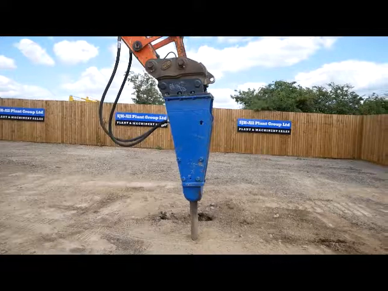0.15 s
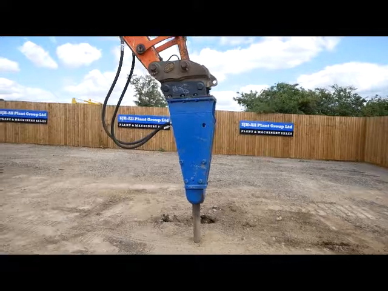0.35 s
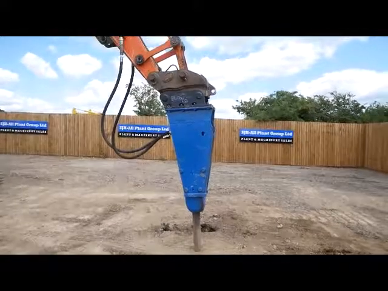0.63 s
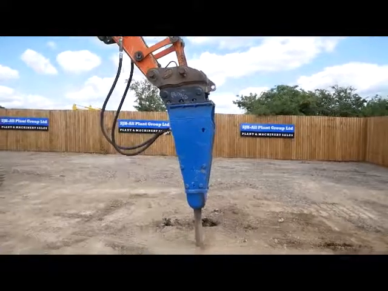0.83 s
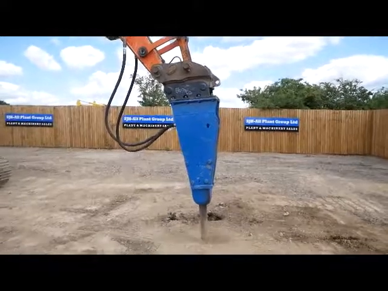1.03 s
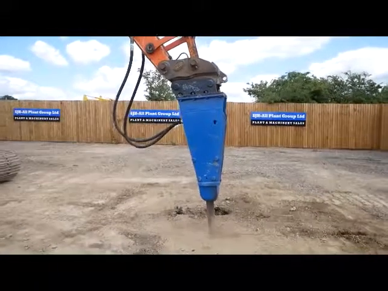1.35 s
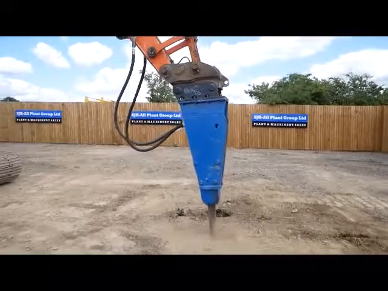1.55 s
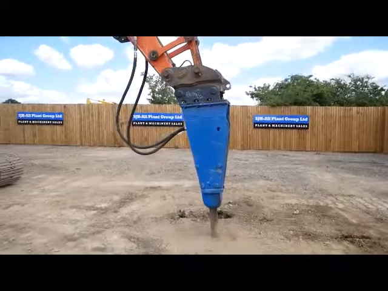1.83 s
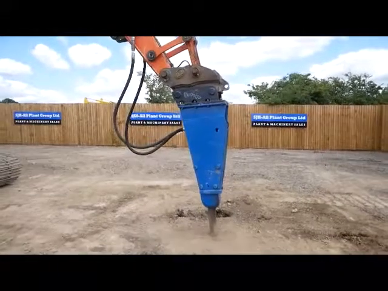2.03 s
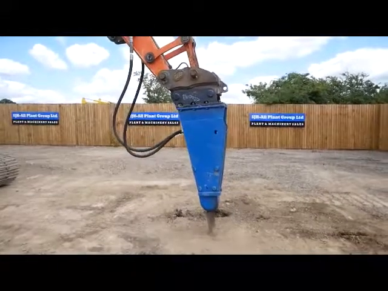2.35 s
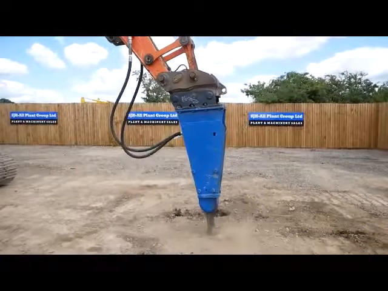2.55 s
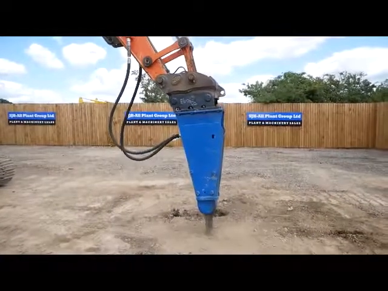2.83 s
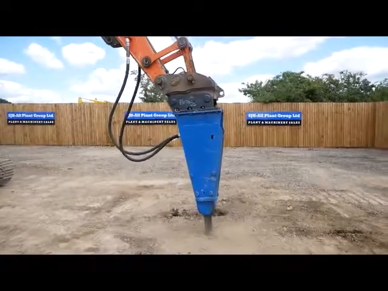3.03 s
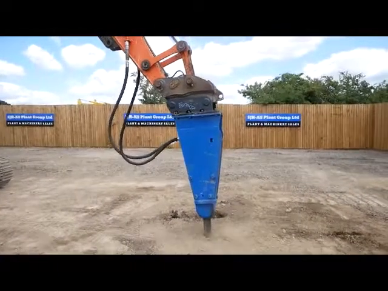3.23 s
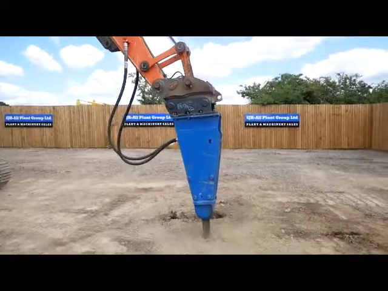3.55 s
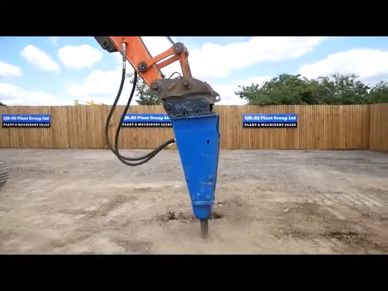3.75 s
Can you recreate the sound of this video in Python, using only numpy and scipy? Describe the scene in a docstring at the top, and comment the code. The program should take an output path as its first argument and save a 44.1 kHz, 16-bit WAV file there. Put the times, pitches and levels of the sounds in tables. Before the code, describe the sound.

A hydraulic breaker starts after 0.2 s silence, pushing into soil with low crunching and dull thuds over a straining diesel and pump hum. From 0.92 to 3.48 s it strikes twenty times, about every 0.13 s: harsh, bright clanks with short thumps, valve hisses and return clicks. Early blows ring and grind stones most; later ones soften. Yard echoes fade into crunching, a thud at 3.64 s and faint engine rush.

```python
"""A hydraulic breaker hammers twenty blows into stony ground between spells of steady pushing.
Each blow sums damped steel modes, coloured noise for the crack, and a falling thump in the soil.
A valve hiss precedes each blow; the click of the piston's return follows all but the last.
Stones grind (random clicks, gliding resonance) and knock (low modes); crunching is filtered grains;
thuds are filtered noise bursts with a low damped push. Wavering sines give the diesel and pump,
noise the fan and oil; decaying noise echoes from a fenced yard."""
import sys
import numpy as np
from scipy import signal
from scipy.io import wavfile
from scipy.ndimage import uniform_filter1d

SR = 44100
rng = np.random.default_rng(int(sys.argv[2]) if len(sys.argv) > 2 else 0)


def log_audio(samples):
    """Write samples as a 16-bit WAV file to the path given in sys.argv[1]."""
    # one column per channel
    frames = np.atleast_2d(samples).T
    # limit to full scale, then quantise
    limited = np.clip(frames, -1, 1)
    pcm = np.round(limited * 32767).astype(np.int16)
    wavfile.write(sys.argv[1], SR, pcm)


N = 171990  # length in samples

# Piston blows: [t/s, level/dB, main steel f/Hz, crack level/dB]
BLOWS = [(0.9223,0,2440,4),(1.0786,-2,2470,-1.5),(1.2172,-2,2440,-4),(1.3525,-1,2446,-2.5),(1.4873,-1.5,2460,-1.5),(1.6202,-1.5,2430,-0.5),(1.7529,-2,2430,-0.5),(1.8849,-2,2410,1),(2.017,-1.5,2394,2),(2.1491,-2.5,2410,1.5),(2.2808,-4,2410,1.5),(2.4131,-5.5,2410,1),(2.5465,-6.5,2410,2),(2.6822,-4,2420,0.5),(2.816,-3.5,2480,1.5),(2.9485,-4,2440,0.5),(3.0811,-3.5,2475,1),(3.2141,-7.5,2500,2.5),(3.3477,-3.5,2440,1),(3.483,-12.5,2370,1.5)]
# Steel modes loaded by the ground; each blow sets the pitch of the first:
# [f/Hz, level/dB, t60/s, gain as the chisel sinks/(dB/s)]
LOADED_MODES = [(2420,0,.045,0),(2905,-8,.05,.5),(2640,-9,.014,0),(1380,-17,.06,3.3),(2120,-16,.012,0),(1620,-23,.025,2.5)]
# Lasting ring of the chisel, before the level of the blow: [f/Hz, level/dB, t60/s]
RING_MODES = [(1346,-38,0.76),(4060,-38.5,0.46),(5650,-43,0.54),(7820,-41.5,0.17),(8430,-52,.3)]
# Bounces that leave the chisel free until it seats: [t/s, length/s, level/dB]
BOUNCES = [(0.92,0.062,-24.5),(1.078,.034,-27.5),(1.215,0.05,-32.5),(1.347,.035,-32),(1.483,0.1,-37.5),(1.75,0.12,-32.5)]
# Modes of the free chisel, relative to the bounce: [f/Hz, level/dB, t60/s]
FREE_MODES = [(2550,-4.5,0.63),(2920,-3,0.97)]
STEEL_DB, STEEL_RISE_S, STEEL_LAG_S = -4, .0007, .0007
MODE_SCATTER = .004  # relative spread of pitch, all modes but the first
CHOKE_S, CHOKE_LEFT = .0056, .05  # time and remaining gain of the choke
RING_FOLLOW = 0.46  # share of the blow's level in dB that the ring follows
RING_SPREAD_DB = 3
STROKE_SPREAD_DB = 1.3  # unevenness of steel modes and valve strokes


def chisel():
    """Modal superposition: the ground damps the steel to a clank and thin ring; a bounce frees it to sing."""
    t, out = ticks(.45), np.zeros(N)
    choke = CHOKE_LEFT + (1 - CHOKE_LEFT) * np.exp(-(t / CHOKE_S) ** 2)  # the ground grips the tip
    onset = 1 - np.exp(-(t / STEEL_RISE_S) ** 2)
    for s, db, main_hz, crack_db in BLOWS:
        sunk_s = s - BLOWS[0][0]
        clank = np.zeros(len(t))
        for i, (mode_hz, mode_db, t60, gain_per_s) in enumerate(LOADED_MODES):
            hz = main_hz if i == 0 else mode_hz * (1 + MODE_SCATTER * rng.standard_normal())
            level = mode_db + gain_per_s * sunk_s + STROKE_SPREAD_DB * rng.standard_normal()
            clank += amp(level) * fade(t, t60) * np.sin(2 * np.pi * hz * (t - STEEL_RISE_S))
        add(out, s + STEEL_LAG_S, amp(STEEL_DB + db) * clank * choke * onset)
        for hz, mode_db, t60 in RING_MODES:
            level = mode_db + crack_db + RING_FOLLOW * db + RING_SPREAD_DB * rng.standard_normal()
            add(out, s, amp(level) * fade(t, t60) * shaken(t, hz))
    for s, length, db in BOUNCES:
        unseated = np.clip((length - t) / 0.00099, 0, 1)
        for hz, mode_db, t60 in FREE_MODES:
            add(out, s, unseated * amp(db + mode_db) * fade(t, t60) * np.sin(2 * np.pi * hz * t))
    return out


# Spectrum of the contact crack: [f/Hz, relative level/dB]
CRACK_SPECTRUM = [(300,-13.5),(800,-8.5),(1500,3),(2000,1.5),(3000,4),(3500,-6),(4800,-2),(7500,-8.5),(10300,-10.5),(12000,-21),(14500,-54)]
# Spectrum of the housing's shudder: [f/Hz, relative level/dB]
HOUSING_SPECTRUM = [(100,-22),(220,7),(380,-11.5),(800,7.5),(1000,4),(1200,-2.5),(1400,7.5),(2400,-8.5),(6000,-19),(10000,-74)]
CRACK_DB, CRACK_T60, CRACK_LEAD_S, CRACK_LIKENESS = -16, 0.03, 0.00039, 0.98
SNAP_DB, SNAP_T60, SNAP_SPREAD_DB = -17, 0.0041, 1.5
HOUSING_DB, HOUSING_T60, HOUSING_RISE_S = -26.5, 0.2, 0.00071
BODY_DB, BODY_T60, BODY_CENTRE_HZ = -38, 0.4, 683  # low modes of chisel and housing
PLATE_DB = -13  # plate ring relative to crack and snap


def casing():
    """Impulsive excitation: contact gives a crack and a shorter snap, and sets the housing shuddering."""
    s, _, _, db = np.transpose(BLOWS)
    contact = s - CRACK_LEAD_S
    crack = bursts(contact, CRACK_DB + db, CRACK_T60, CRACK_SPECTRUM, likeness=CRACK_LIKENESS)
    snap_db = SNAP_DB + db + SNAP_SPREAD_DB * rng.standard_normal(len(s))
    snap = bursts(contact, snap_db, SNAP_T60, CRACK_SPECTRUM, rise=0.00049)
    housing = bursts(s, HOUSING_DB + db, HOUSING_T60, HOUSING_SPECTRUM, rise=HOUSING_RISE_S)
    for at in s:
        add(housing, at, knock(BODY_DB, BODY_CENTRE_HZ, BODY_T60))
    return plates(crack + snap, PLATE_DB) + housing


# Spectrum of valve hiss and rattle: [f/Hz, relative level/dB]
VALVE_SPECTRUM = [(200,-13.5),(600,13.5),(1500,5.5),(6000,-6),(10500,-14.5),(15000,-34)]
# Spectrum of the piston's return: [f/Hz, relative level/dB]
RETURN_SPECTRUM = [(400,-9),(1500,0),(2100,-9),(2480,11.5),(3000,-3.5),(9000,-17),(13000,-57)]
VALVE_LEAD_S, VALVE_DB, VALVE_T60, VALVE_RISE_S = .0255, -19, 0.04, 0.0074
FIRST_VALVE_DB = 7  # extra level of the first valve stroke
RETURN_LAG_S, RETURN_DB, RETURN_T60 = .071, -28.5, 0.067
RATTLE_DB, RATTLE_T60, RATTLE_PER_S = -42, .55, 700  # pins and bushings
LOOSE_PLATE_DB = -5  # loose parts ring the plates more than the choked blow does


def loose_parts():
    """Flow noise and repeated impact: uneven valve strokes; pins and bushings rattle on after every blow."""
    s, _, _, db = np.transpose(BLOWS)
    valve_db, back_db = db + STROKE_SPREAD_DB * rng.standard_normal((2, len(s)))
    valve_db = VALVE_DB + valve_db + FIRST_VALVE_DB * (s == s[0])
    valve = bursts(s - VALVE_LEAD_S, valve_db, VALVE_T60, VALVE_SPECTRUM, rise=VALVE_RISE_S)
    back = bursts(s[:-1] + RETURN_LAG_S, RETURN_DB + back_db, RETURN_T60, RETURN_SPECTRUM,
                  rise=0.0038, likeness=0.56)
    shake = np.zeros(N)
    for at in s:
        add(shake, at, amp(RATTLE_DB) * fade(ticks(RATTLE_T60), RATTLE_T60))
    t = ticks(.01)
    click = rng.standard_normal(len(t)) * fade(t, t[-1])
    clicks = signal.oaconvolve(grains(RATTLE_PER_S, spread_db=3), click)[:N]
    rattle = colour(shake * unit(clicks), VALVE_SPECTRUM)
    return plates(valve + back + rattle, LOOSE_PLATE_DB)


THUMP_DB, THUMP_S = -25.5, 0.003  # level and time of the peak
THUMP_FROM_HZ, THUMP_TO_HZ, THUMP_SAG_S = 323, 88, 0.0046  # before the random scaling of pitch


def thumps():
    """Transient loading: the ground takes each blow with a short thump of falling pitch."""
    t, out = ticks(.1), np.zeros(N)
    hz = THUMP_TO_HZ + (THUMP_FROM_HZ - THUMP_TO_HZ) * np.exp(-t / THUMP_SAG_S)
    turns = np.cumsum(hz) / SR
    for s, *_ in BLOWS:
        add(out, s, amp(THUMP_DB) * pulse(t, THUMP_S) * np.sin(2 * np.pi * turns * rng.uniform(0.79, 1.1)))
    return out


# Stone grinding under the chisel: [t/s, length/s, level/dB]
GRINDS = [(0.966,0.11,-24),(1.11,0.1,-22.5),(1.252,0.097,-26),(1.376,0.13,-30),(1.573,0.047,-31.5),(1.691,0.06,-31),(1.825,0.0566,-34),(1.955,0.061,-29.5),(2.209,0.044,-30.5),(3.493,0.12,-39.5)]
# Spectrum of the grit: [f/Hz, relative level/dB]
GRIT_SPECTRUM = [(140,-10),(230,3.5),(450,2.5),(850,3),(1200,-0.5),(2300,0.5),(3700,-6),(9500,-31.5),(12500,-64)]
# Stones giving way: [t/s, level/dB, centre f/Hz]
KNOCKS = [(.668,-26,622),(.980,-17.5,760),(.993,-21,545),(1.010,-16.5,283),(1.052,-22,215),(1.129,-18,760),(1.153,-18.5,290),(1.182,-21.5,235),(1.272,-22.5,786),(1.30,-22.5,260),(1.43,-23.5,454),(1.463,-25,227),(1.580,-21.5,666),(1.848,-28.5,570),(1.98,-26.5,566),(2.241,-23,600),(2.487,-23,596),(2.919,-24.5,278),(2.958,-27.5,750)]
GRIND_TONE_DB, GRIND_WIDTH_HZ = -4.5, 210  # level relative to the force, width of each resonance
GRIND_FROM_HZ, GRIND_TO_HZ, GRIND_SAG_S = 943, 187, 0.0327
KNOCK_T60 = 0.11


def stones():
    """Stochastic friction: grit crackles with a falling hollow resonance, and stones give way with knocks."""
    press, hollow = np.zeros(N), np.zeros(N)
    for s, length, db in GRINDS:
        age = ticks(length)
        force = amp(db) * np.sin(np.pi * age / length).clip(0) ** 0.19
        hz = GRIND_TO_HZ + (GRIND_FROM_HZ - GRIND_TO_HZ) * np.exp(-age / GRIND_SAG_S)
        tone = rng.standard_normal(len(age))
        for _ in range(2):
            tone = resonate(tone, hz, GRIND_WIDTH_HZ)
        add(press, s, force)
        add(hollow, s, amp(GRIND_TONE_DB) * force * unit(tone))
    for s, db, hz in KNOCKS:
        add(hollow, s, knock(db, hz, KNOCK_T60))
    return colour(press * grains(per_s=3000, spread_db=3), GRIT_SPECTRUM) + hollow


# Soil cracking under the steady push: [t/s, level/dB]
THUDS = [(0.217,-18),(0.242,-26),(0.444,-17),(0.582,-20),(0.673,-18),(0.777,-16.5),(3.64,-22)]
# Spectrum of the soil's crunch and of the thuds' noise: [f/Hz, relative level/dB]
SOIL_SPECTRUM = [(25,-48),(50,-24),(110,-3),(200,3),(330,-3),(800,-17),(1200,-30),(2400,-37),(15000,-88)]
# Rumble of the soil over time: [t/s, level/dB]
PUSH = [(.21,-22.5),(.32,-23),(.39,-28.5),(.55,-23),(.72,-28),(.87,-25.5),(.95,-33),(2.5,-40.5),(3.4,-36.5),(3.48,-29),(3.78,-33),(3.9,-38)]
SOIL_GRAINS_PER_S, SOIL_SPREAD_DB = 900, 2
THUD_T60, THUD_HZ, THUD_S = 0.086, 170, .006  # noise decay; pitch and peak time of the low push


def soil():
    """Yielding under load: grains crunch under the arm's weight; thuds join a noise burst to a low push."""
    t = ticks(.08)
    crunch = colour(curve(PUSH) * grains(SOIL_GRAINS_PER_S, SOIL_SPREAD_DB), SOIL_SPECTRUM)
    out = crunch + bursts(*np.transpose(THUDS), THUD_T60, SOIL_SPECTRUM, rise=0.0002)
    for s, db in THUDS:
        add(out, s, amp(db) * pulse(t, THUD_S) * np.sin(2 * np.pi * THUD_HZ * t))
    return out


# Lines of diesel and pump, relative to the load curve: [f/Hz, level/dB]
ENGINE_LINES = [(52,-17),(104,0),(578,-10),(701,-14)]
# Engine level under load: [t/s, level/dB]
LOAD = [(.21,-38),(.5,-33),(.77,-29),(.9,-40),(1.5,-48),(3.9,-45)]
WAVER = 0.0086  # rms relative wander of pitch


def engine():
    """Frequency modulation: firing orders and pump whine waver in pitch, their level following the load."""
    out = np.zeros(N)
    for hz, db in ENGINE_LINES:
        drift = unit(uniform_filter1d(rng.standard_normal(N), size=2500))
        out += amp(db) * np.sin(2 * np.pi * np.cumsum(hz * (1 + WAVER * drift)) / SR)
    return out * curve(LOAD)


NEAR_T60, NEAR_DB = 0.046, -15


def nearby(x):
    """Early reflection: decaying noise taps stand for quick returns from the ground and the arm."""
    t = ticks(.04)
    taps = rng.standard_normal((2, len(t))) * fade(t, NEAR_T60)
    return amp(NEAR_DB) * signal.oaconvolve(x[None], taps / np.linalg.norm(taps[0]), axes=1)[:, :N]


# Reverberation time of the yard: [f/Hz, t60/s]
YARD_T60 = [(100,0.091),(1000,0.84),(4000,1),(12000,0.26)]
# Spectrum of the yard's echoes: [f/Hz, level/dB]
YARD_COLOUR = [(100,-15.5),(400,-5),(1000,-10),(2500,-17),(5000,-22),(12000,-36.5)]


def yard(x):
    """Diffuse reverberation: scattered echoes from ground, machine and fence, different at each ear."""
    hz, t, z = signal.stft(rng.standard_normal((2, SR // 2)), SR, nperseg=256)
    z = z * fade(t, read(YARD_T60, hz)[:, None])
    tail = signal.istft(z, SR, nperseg=256)[1]
    shaped = signal.istft(z * amp(read(YARD_COLOUR, hz))[:, None], SR, nperseg=256)[1]
    return signal.fftconvolve(x[None], shaped / np.linalg.norm(tail[0]), axes=1)[:, :N]


# Spectrum of fan and oil flow: [f/Hz, relative level/dB]
HISS_SPECTRUM = [(25,-25),(100,6.5),(600,5.5),(2500,-8),(10000,-36.5),(14000,-58.5)]
HISS_DB = -47


def hiss():
    """Turbulent flow noise: smooth rush of cooling fan and oil, partly different at each ear."""
    both, left, right = (colour(z, HISS_SPECTRUM) for z in rng.standard_normal((3, N)))
    return amp(HISS_DB) * unit(both + .5 * np.array([left, right]))


# Low modes of chisel and housing: [f/Hz]
BODY_HZ = [205, 272, 450, 545, 787, 980]
BODY_REACH, BODY_SPREAD_DB = .3, 1.5  # width of the excited band (log ratio), unevenness of the modes
KNOCK_RISE_S = 0.0043


def knock(db, centre_hz, t60):
    """Selective modal excitation: a soft impact rings the low modes near centre_hz, unevenly each time."""
    t, hz = ticks(.4), np.array(BODY_HZ)
    uneven = amp(BODY_SPREAD_DB * rng.standard_normal(len(hz)))
    share = np.exp(-(np.log(hz / centre_hz) / BODY_REACH) ** 2 / 2) * uneven
    modes = sum(g * shaken(t, f) for f, g in zip(hz, share / np.linalg.norm(share)))
    return amp(db) * 2 * modes * fade(t, t60) * (1 - np.exp(-t / KNOCK_RISE_S))


PLATE_LO_HZ, PLATE_HI_HZ, PLATE_T60 = 4600, 11500, 0.11


def plates(x, ring_db):
    """Modal density: many high modes of the steel plates, a few of them strong, ring on after each crack,
    stroke and rattle."""
    t = ticks(.4)
    ring = np.zeros(len(t))
    for place, size, phase in rng.random((70, 3)):
        hz = PLATE_LO_HZ + place * (PLATE_HI_HZ - PLATE_LO_HZ)
        ring += np.log(1 - size) * np.sin(2 * np.pi * (hz * t + phase))
    ring *= fade(t, PLATE_T60)
    return x + amp(ring_db) * signal.oaconvolve(x, ring / np.linalg.norm(ring))[:N]


RING_FLUTTER_HZ, RING_ROUGH = 35, .55  # rattling in its bushing shakes the ring


def flutter(t):
    """Narrow-band modulation: slow random wander of a mode's strength and phase."""
    z = rng.standard_normal(len(t)) + 1j * rng.standard_normal(len(t))
    lowpass = np.exp(-(np.fft.fftfreq(len(t), 1 / SR) / RING_FLUTTER_HZ) ** 2)
    z = np.fft.ifft(np.fft.fft(z) * lowpass)
    wander = RING_ROUGH * z / np.sqrt(np.mean(abs(z) ** 2))
    return (np.exp(2j * np.pi * rng.random()) + wander) / np.hypot(1, RING_ROUGH)


def shaken(t, hz):
    """Modulated oscillation: one mode, roughened by rattling."""
    return (np.exp(2j * np.pi * hz * t) * flutter(t)).real


def resonate(x, hz, width):
    """Heterodyne resonance: shift to zero frequency, low-pass, shift back along the curve hz."""
    turn, r = np.exp(2j * np.pi * np.cumsum(hz) / SR), np.exp(-np.pi * width / SR)
    return 2 * (turn * signal.lfilter([1 - r], [1, -r], x / turn)).real


def bursts(times, dbs, t60, spectrum, rise=.0003, likeness=0.):
    """Decaying noise: dense rings that die quickly; likeness is the power share that repeats each time."""
    t, out = ticks(.3), np.zeros(N)
    body = rng.standard_normal(len(t))
    for s, db in zip(times, dbs):
        noise = np.sqrt(likeness) * body + np.sqrt(1 - likeness) * rng.standard_normal(len(t))
        add(out, s, amp(db) * noise * fade(t, t60) * (1 - np.exp(-t / rise)))
    return colour(out, spectrum)


def grains(per_s, spread_db):
    """Shot noise: random clicks of uneven size and either sign, scaled to rms 1."""
    size = amp(spread_db * np.minimum(rng.exponential(1, N), 4))
    return unit((rng.random(N) < per_s / SR) * rng.choice([-1, 1], N) * size)


def colour(x, points):
    """Minimum-phase filtering: a causal filter of unit energy with the given spectrum."""
    log_gain = np.log(amp(read(points, abs(np.fft.fftfreq(4096, 1 / SR)))))
    # the Hilbert transform of the log gain gives the phase
    taps = np.fft.ifft(np.exp(np.conj(signal.hilbert(log_gain)))).real[:2048]
    return signal.oaconvolve(x, taps / np.linalg.norm(taps))[:N]


def pulse(t, peak_s):
    """Critically damped envelope that reaches 1 at peak_s."""
    return t / peak_s * np.exp(1 - t / peak_s)


def fade(t, t60):
    """Exponential decay by 60 dB in t60 seconds."""
    return np.exp(-np.log(1000) * t / t60)


def ticks(length):
    """Uniform sampling: time axis in seconds."""
    return np.arange(round(length * SR)) / SR


def amp(db):
    """Logarithmic level: decibels to gain."""
    return 10 ** (np.asarray(db) / 20)


def unit(x):
    """Power normalisation: scales to rms 1."""
    return x / np.sqrt(np.mean(x ** 2) + 1e-20)


def read(points, hz):
    """Logarithmic frequency: interpolates a spectrum on a log axis."""
    f, v = np.transpose(points)
    return np.interp(np.log(hz + 1), np.log(f + 1), v)


def curve(points):
    """Level envelope: gain over time from (t/s, level/dB) points."""
    return amp(np.interp(np.arange(N) / SR, *np.transpose(points)))


def add(mix, s, sound):
    """Superposition: mixes a sound in at s seconds."""
    part = mix[max(round(s * SR), 0):][:len(sound)]
    part += sound[:len(part)]


SOIL_PAN_DB = 1.3  # raised on the left, lowered on the right


def scene():
    """Interaural level difference: breaker ahead, ground and engine a little to the left."""
    breaker = chisel() + casing() + loose_parts() + thumps() + stones()
    low = soil() + engine()
    sides = np.array([[1], [-1]])
    direct = breaker + low * amp(sides * SOIL_PAN_DB)
    return direct + nearby(breaker + low) + yard(breaker + low) + hiss()


START_S, EDGE_HZ = 0.2072, 16400  # opening time, upper band edge


def record(dry):
    """Clipping and band limitation: an abrupt opening, peaks cut at full scale, then a low-pass."""
    opened = np.clip((np.arange(N) / SR - START_S) / 0.0039, 0, 1)
    lowpass = signal.firwin(511, EDGE_HZ, window=("kaiser", 9), fs=SR)
    return signal.oaconvolve(np.clip(dry * opened, -1, 1), lowpass[None], "same")


dry = scene()
out = record(dry)
log_audio(out)
```